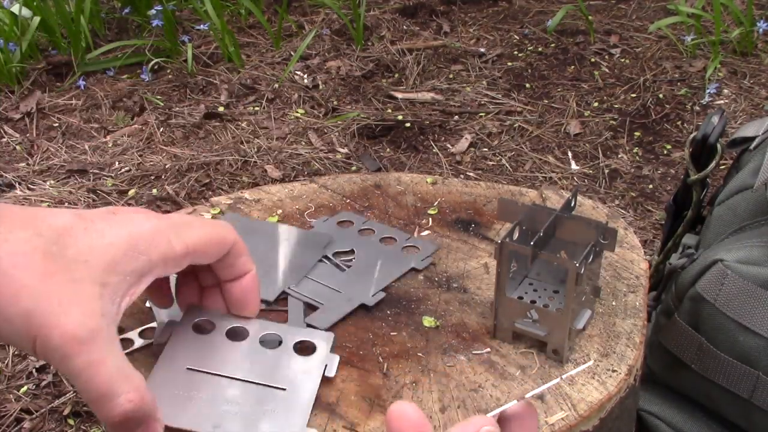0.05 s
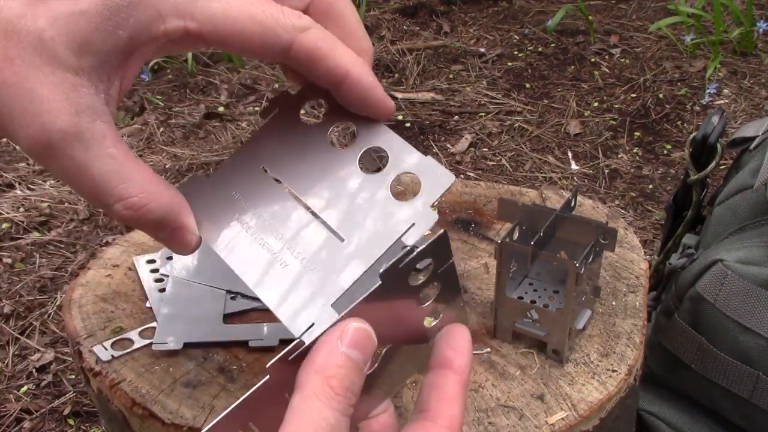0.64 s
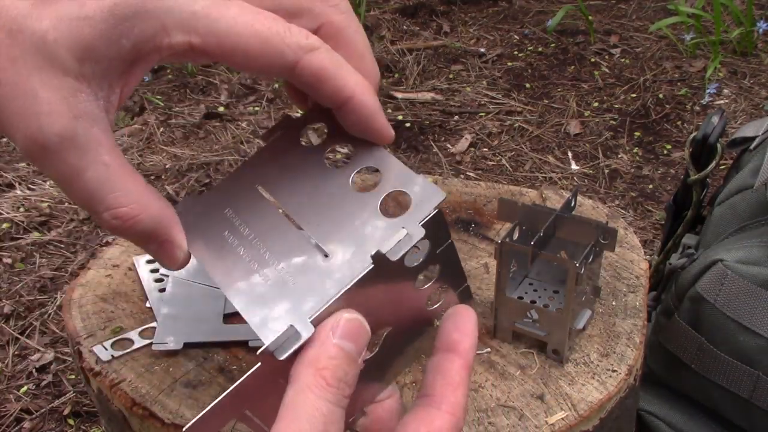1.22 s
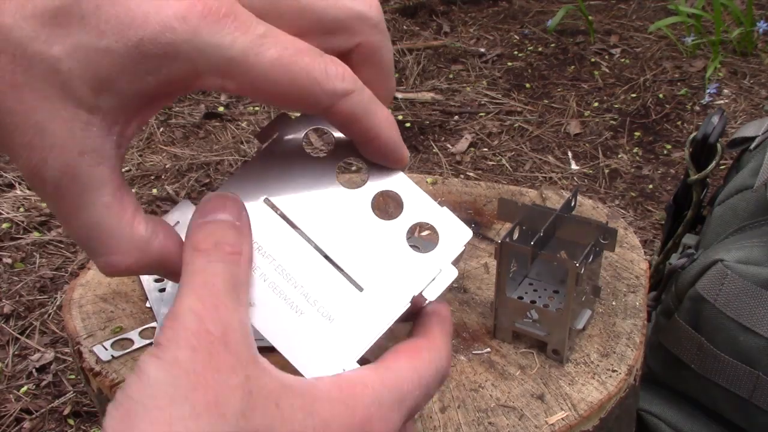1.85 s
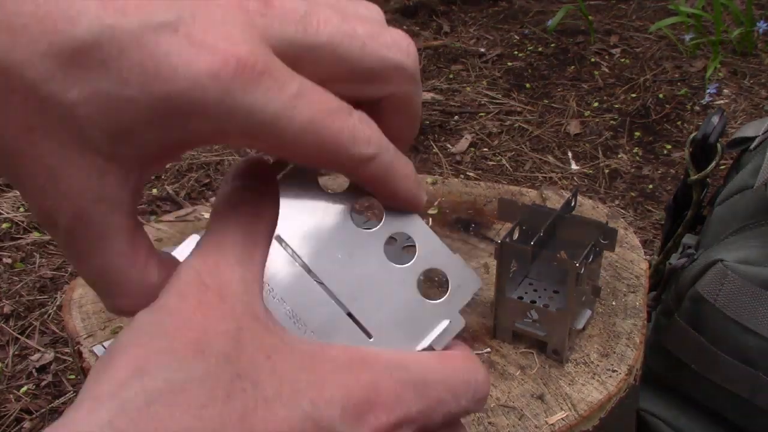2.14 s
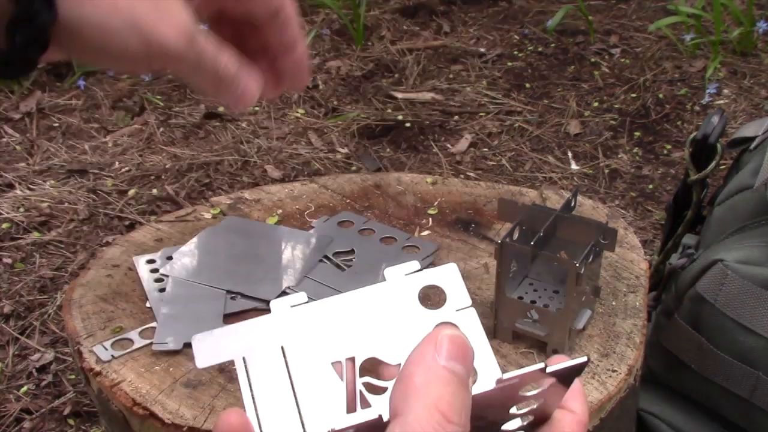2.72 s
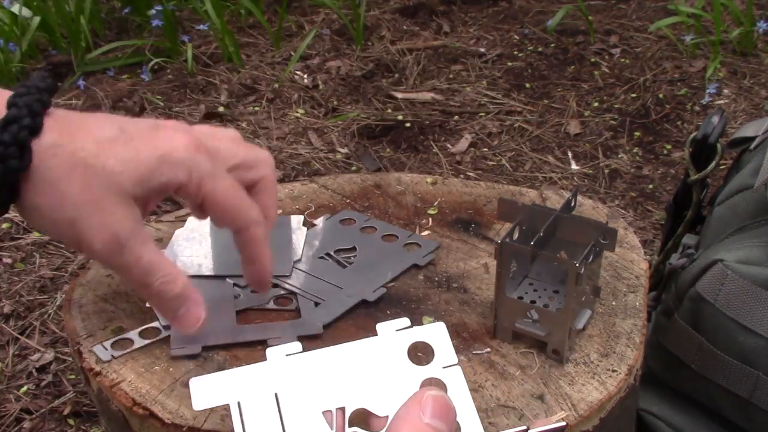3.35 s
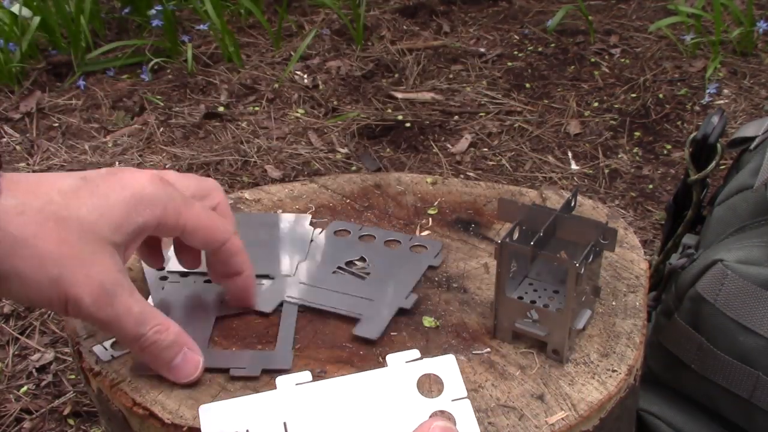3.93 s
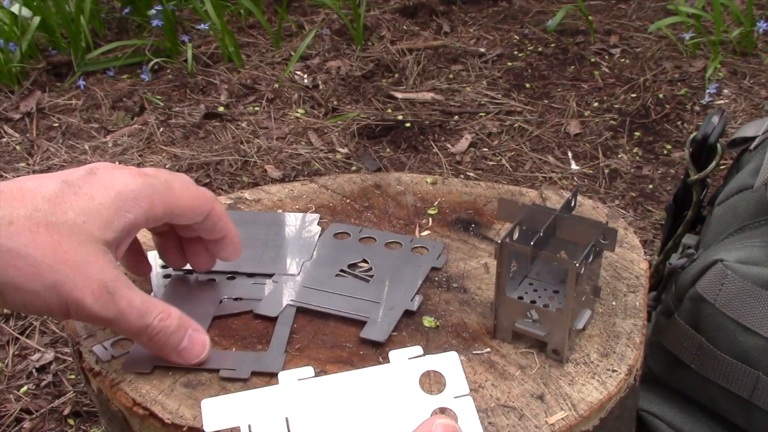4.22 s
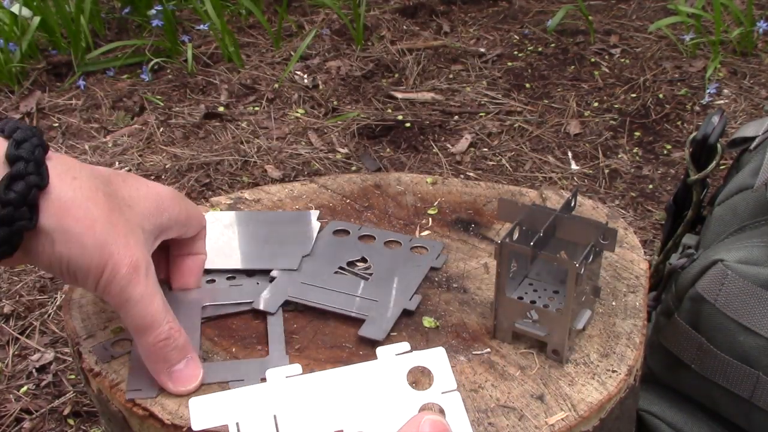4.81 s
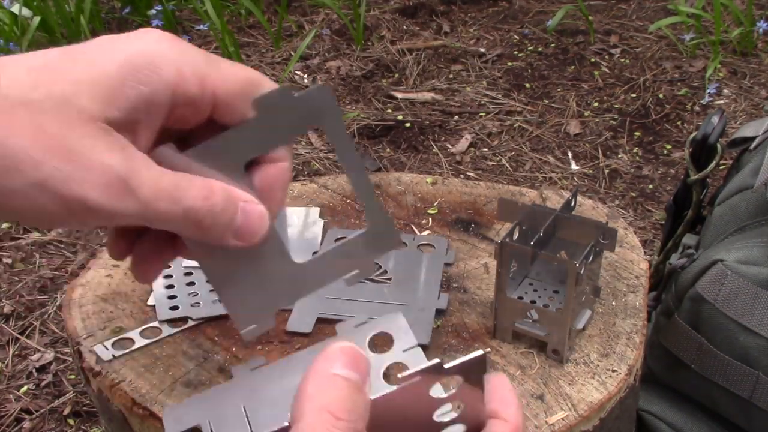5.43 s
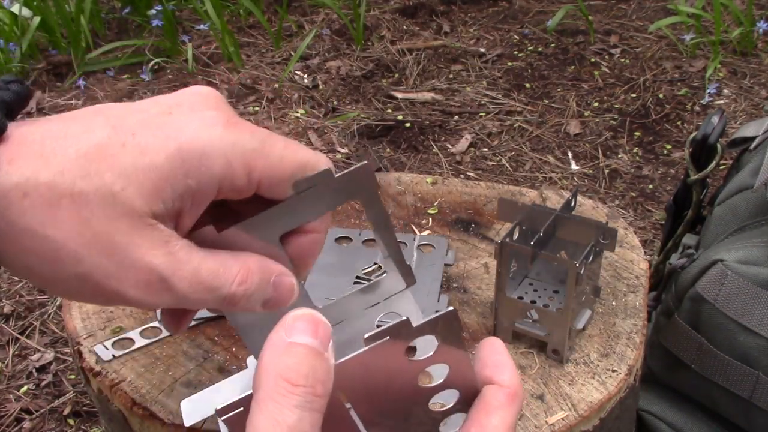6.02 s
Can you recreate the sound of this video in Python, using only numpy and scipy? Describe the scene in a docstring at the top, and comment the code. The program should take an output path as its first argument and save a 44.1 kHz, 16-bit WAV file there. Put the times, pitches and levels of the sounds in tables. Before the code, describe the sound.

Thin steel panels scrape, click and ring as they are handled outdoors, over a low rumble of far traffic.

```python
"""In a wood, close by over a tree stump, the thin steel panels of a folding stove are handled.
Loose panels are dragged off a pile: tiny rough spots catch and let go, and the panels knock and ring.
Panels held in the fingers click and scrape as their tabs are fitted together; the fingers stop the ring.
Far traffic rumbles behind, and one engine passes."""
import sys
import numpy as np
from scipy import signal
from scipy.fft import rfft, irfft
from scipy.io import wavfile
from scipy.ndimage import uniform_filter1d

SR = 44100
rng = np.random.default_rng(int(sys.argv[2]) if len(sys.argv) > 2 else 0)


def output_pcm(signal):
    """Save a mono or channel-first signal as 16-bit PCM at the path in sys.argv[1].

    Samples are clipped to [-1, 1] before scaling.
    """
    pcm = np.clip(np.atleast_2d(signal).T, -1, 1) * 32767
    wavfile.write(sys.argv[1], SR, np.round(pcm).astype(np.int16))


N = 267246
T = np.arange(N) / SR
RING_T = T[:SR // 2]
SLOTTED_S = 2.7   # by now the wall panel is joined to the held ones and the hand returns to the pile

# Spectrum of far traffic and leaves: pitch_hz, relative_db
AIR_SPECTRUM = [(15, -70), (25, -36.5), (84, -5.5), (130, 0), (249, -2), (427, -9.5), (531, -12), (887, -7),
                (2690, -28), (11300, -44.5), (14800, -53.5), (16000, -50)]
# A far engine's tones at its nearest: pitch_hz, level_db
ENGINE_HUM = [(113.0, -47.5), (236.9, -54)]

# A mode is one tone a panel rings at; the wider it is, the sooner it dies.
# Modes of the panels held in the fingers: pitch_hz, width_hz, relative_db
HELD_PANEL_MODES = [(1158, 59, 3), (1900, 270, -3.5), (3020, 44, -1), (4070, 120, -5.5), (4810, 45, -6.5),
                    (6110, 42, -4), (7100, 78, -3.5), (7400, 49, -7), (8230, 75, -4.5), (9430, 51, -5.5),
                    (12070, 100, 0.5)]
# Modes of the held panels once slotted together: pitch_hz, width_hz, relative_db
JOINED_PANEL_MODES = [(1350, 95, 2.5), (2276, 75, 1), (3710, 150, -1.5), (4440, 180, -2.5),
                      (5360, 87, -5.5), (6460, 180, -6), (7390, 100, -3.5), (8000, 76, -8), (8330, 157, -4),
                      (9720, 110, -3.5), (11000, 100, -5.5), (11500, 39, -14), (12600, 54, -10)]
# Spectrum of the held panels' short clatter: pitch_hz, relative_db
HELD_SPECTRUM = [(60, -8), (400, -25), (900, -4), (2100, 3), (3700, -1), (6000, -5), (9000, -4.5),
                 (12000, -8), (14000, -20), (16000, -8.5)]
# Fingers shift on the steel: start_s, length_s, level_db
FINGER_RUBS = [(0.464, 0.053, -68), (1.45, 0.12, -55.5), (1.628, 0.028, -60.5), (1.708, .19, -61.5),
               (1.952, 0.055, -54), (2.014, 0.066, -59.5), (2.093, 0.069, -52), (2.192, 0.026, -59),
               (2.3, 0.12, -72.5), (2.494, .05, -57.5)]
# Tabs snap in (more tilt is brighter): start_s, level_db, tilt_db_per_octave, main_pitch_hz
TAB_SNAPS = [(.673, -20.5, 5.5, 11860), (0.692, -41.5, 0, 9200), (1.021, -26, 3, 11850),
             (1.218, -29, -3, 3040), (5.552, -17, 2, 1337), (5.560, -25, 0, 3780), (5.641, -30, 3, 2880),
             (5.825, -19, -0.5, 2205), (5.839, -22.5, 11, 2770), (5.891, -25, 5.5, 950),
             (6.008, -24, -1, 2160)]
# An edge scrapes into its slot: start_s, length_s, level_db, tilt_db_per_octave, main_pitch_hz
SLOT_SCRAPES = [(0.707, 0.019, -49, -1, 8600), (0.768, 0.068, -50.5, 4, 9100),
                (0.827, 0.019, -43.5, -1.5, 3080), (0.86, 0.023, -42, -6.5, 2450),
                (0.933, 0.099, -51.5, -1, 12100), (0.988, 0.0074, -37.5, 3, 7470),
                (1.123, 0.07, -37.5, 1.5, 3600), (1.204, 0.014, -42, 1, 4880),
                (1.215, 0.017, -27.5, -0.5, 1925), (1.968, 0.012, -50, -9, 4300),
                (2.121, 0.013, -46.5, 0.5, 4520), (5.608, 0.0082, -45, 3, 6200),
                (5.63, 0.017, -32, -2.5, 2276), (5.676, 0.041, -28.5, 2, 4330),
                (5.759, 0.015, -28, -1, 2280), (5.821, 0.029, -22.5, -4.5, 3490),
                (5.881, 0.013, -30, -3, 1270), (5.943, 0.055, -36.5, -1, 2230),
                (5.987, 0.024, -26, -2, 1820)]

# Modes of the loose panels: pitch_hz, width_hz, relative_db
LOOSE_PANEL_MODES = [(1907, 28, -7.5), (2364, 8.7, -10.5), (3069, 26, -1), (3666, 24, -2), (3896, 18, -8),
                     (3930, 11, -4), (4470, 25, -6.5), (4773, 34, -8.5), (4700, 22, -2), (5072, 19, -5.5),
                     (6200, 50, -1), (6700, 17, -5.5), (7380, 19, -4.5), (7250, 24, 4.5), (7270, 11, -5.5),
                     (7680, 13, 4), (8023, 37, 1.5), (8100, 50, -12), (9110, 49, 1.5), (9200, 63, 3),
                     (9500, 30, -6), (10210, 48, 6), (10450, 36, -5), (11600, 47, -0.5), (12730, 63, -7),
                     (12920, 27, 4), (13800, 55, -4)]
# Modes of the wall panel as it slides off: pitch_hz, width_hz, relative_db
WALL_PANEL_MODES = [(1930, 19, -20), (3070, 68, -2), (3940, 55, -5), (4310, 19, 0.5), (6070, 120, -4),
                    (7300, 25, -5), (7900, 49, 5), (8800, 58, -12), (10300, 114, 1), (11260, 39, 0),
                    (12300, 63, -3)]
# Long-ringing modes of the open frame panel: pitch_hz, width_hz, relative_db
FRAME_PANEL_MODES = [(600.5, 6.3, -13), (720, 7.3, -6.5), (1116, 10.4, -9.5), (2906, 4.6, -0.5),
                     (3900, 5.2, 0.5), (5080, 6.4, -6), (5680, 10, -1), (6190, 6.9, -0.5), (7400, 17, 2),
                     (8200, 12, -2), (8700, 10, 4), (9100, 15, 5), (11200, 11, 8)]
# Spectrum of the pile's short clatter: pitch_hz, relative_db
PILE_SPECTRUM = [(60, -41), (400, -43), (1200, -16.5), (1900, -4), (2600, -7.5), (3900, -2), (5500, -8),
                 (7500, 6.5), (8600, 4.5), (10300, 4.5), (12700, 2), (13900, -10), (15200, -8.5),
                 (16500, 5)]
# The pile's ring compared with its clatter, more as the frame lifts: time_s, panels_db, frame_db
RING_FREEDOM = [(3.2, -9.5, -38), (3.65, -1, -14), (4.5, -6, -24), (4.95, -4, -11), (5.12, 6.5, -3),
                (5.35, 2, -8.5)]
# Knocks in the pile: start_s, relative_db, tilt_db_per_octave
PILE_KNOCKS = [(2.989, -36.5, -1), (3.021, -33, -6), (3.1504, -21, -7), (3.4088, -26, 0), (3.697, -17, -3),
               (3.8895, -15, -2), (3.9375, -21, 3), (4.0342, -14, -3), (4.278, -25.5, -2),
               (4.2978, -17, -1.5), (4.327, -29, 1), (4.439, -23.5, 1), (4.492, -22.5, -2), (4.551, -27, 0),
               (4.6725, -21, -3.5), (4.6962, -20.5, -4.5), (4.8779, -24, 0.5), (4.9376, -17.5, 2.5),
               (5.033, -11, -5), (5.0677, -4.5, -2.5)]
# Sudden slips in the pile: start_s, length_s, level_db, tilt_db_per_octave
PILE_SLIPS = [(0.103, 0.023, -25, -5.5), (3.011, 0.015, -36, -3.5), (3.06, .015, -40, -6),
              (3.156, 0.017, -23, -0.5), (4.035, 0.043, -21, -2.5), (4.692, .012, -17.5, -1),
              (5.03, 0.022, -16, -3), (5.07, 0.027, -12, -2.5), (5.167, 0.028, -10, 1),
              (5.199, 0.027, -12, 2.5), (5.322, 0.02, -23.5, -2)]
# Drags over the pile: full_speed_at_s, speed_up_s, hold_s, slow_down_s, treble_db, body_vs_treble_db
PANEL_DRAGS = [(0.026, 0.11, 0.09, 0.13, -24.5, -4.5), (3.081, 0.035, 0.24, 0.087, -52, -2),
               (3.419, 0.027, 0.018, 0.19, -38.5, -2.5), (3.585, 0.19, 0.013, 0.11, -35.5, -1.5),
               (3.65, 0.049, 0.12, 0.14, -32, -3.5), (3.95, 0.053, 0.084, 0.23, -29, -6.5),
               (4.042, .04, 0.027, 0.14, -23, -3.5), (4.39, .22, .025, 0.21, -32.5, -4),
               (4.721, 0.043, 0.035, 0.17, -42.5, -3), (4.95, 0.027, 0.093, .1, -29, -4),
               (5.075, .14, .16, 0.17, -14.5, -4)]

# Bands where the left and right microphones respond unequally: pitch_hz, width_hz, relative_db
MICROPHONE_BANDS = [(5700, 400, -16.5), (9630, 530, -21.5), (13200, 540, -12)]


def from_db(db):
    """Turn decibels into a gain."""
    return 10 ** (np.asarray(db) / 20)


def unit_energy(x):
    """Scale a sound so its squares add up to 1."""
    return x / np.sqrt(np.sum(x ** 2) + 1e-20)


def add(track, start_s, sound):
    """Mix a sound into a track."""
    at = max(round(start_s * SR), 0)
    track[at:at + len(sound)] += sound[:N - at]


def along(rows, t):
    """Read a table's columns at the times t, gliding between rows."""
    times, *columns = np.transpose(rows)
    return np.array([np.interp(t, times, column) for column in columns])


def noise(spectrum, size, tilt=0):
    """Noise of strength 1 with the given spectrum, tilted in dB per octave."""
    hz, db = np.transpose(spectrum)
    octave = np.log2(np.fft.rfftfreq(size, 1 / SR) + 1)
    gain = from_db(np.interp(octave, np.log2(hz), db + tilt * np.log2(hz)))
    x = irfft(rfft(rng.standard_normal(size)) * gain, size)
    return x / x.std()


def drift(per_s, size=N):
    """A slow random wander, mostly between -1 and 1."""
    return np.interp(T[:size] * per_s, np.arange(size), rng.standard_normal(size))


def far_traffic(level_db=-45.5, side_db=-20, rise_db=5, rise_at_s=3.7, ease_s=0.44):
    """Far traffic and leaves make a rumble that swells once, nearly the same in both ears."""
    air = noise(AIR_SPECTRUM, N) + from_db(side_db) * noise(AIR_SPECTRUM, N) * [[1], [-1]]
    swell = (1 + np.tanh((T - rise_at_s) / ease_s)) / 2
    return from_db(level_db + rise_db * swell) * air


def passing_engine(nearest_s=4.8, pass_s=0.48, waver_hz=2.3, waver_db=3.5):
    """A far engine's wavering hum grows as it nears and fades as it leaves."""
    hum = 0
    for hz, db in ENGINE_HUM:
        gain = from_db(db + waver_db * drift(9)) * np.sqrt(2)
        phase = 2 * np.pi * np.cumsum(hz + waver_hz * drift(8)) / SR
        hum += gain * np.sin(phase)
    distance = np.hypot(1, (T - nearest_s) / pass_s)
    return hum / distance


def ring(modes, tilt=0):
    """Clear tones die away after one touch; their strengths depend on where the panel is touched."""
    hz, width, db = np.transpose(modes)[:, :, None]
    place = rng.uniform(.65, 1.35, hz.shape) * rng.choice([-1, 1], hz.shape)
    gain = from_db(db + tilt * np.log2(hz)) * place * np.sqrt(width)
    decay = np.exp(-np.pi * width * RING_T)
    return unit_energy(np.sum(gain * decay * np.sin(2 * np.pi * hz * RING_T), axis=0))


def clatter(spectrum, fade_s, tilt=0, tail_db=-32, tail_s=0.19):
    """Modes too crowded to tell apart drop 60 dB in fade_s; a quiet tail lasts longer."""
    decay = 1000 ** (-RING_T / fade_s) + from_db(tail_db) * 1000 ** (-RING_T / tail_s)
    return unit_energy(noise(spectrum, len(RING_T), tilt) * decay)


def friction(size, per_s, spread_db):
    """Rough spots catch and let go: a stream of tiny uneven taps."""
    caught = rng.random(size) < per_s / SR
    strength = from_db(spread_db * np.minimum(rng.exponential(1, size), 3))
    taps = caught * strength * rng.choice([-1, 1], size)
    return unit_energy(taps) * np.sqrt(size)


def stroke(length_s, per_s=5000):
    """The force of a short slide: pressure swells and lets go."""
    size = max(int(length_s * SR), 16)
    pressure = np.sin(np.pi * (np.arange(size) + .5) / size) ** 0.55
    return friction(size, per_s, spread_db=4) * pressure


def impact(chatter_db, chatter_s):
    """The force of one sharp touch, after which the edge chatters to rest."""
    t = T[:SR // 10]
    chatter = friction(len(t), per_s=3000, spread_db=2.5) * np.exp(-t / chatter_s)
    force = from_db(chatter_db) * unit_energy(chatter)
    force[0] += 1
    return force


def sound_panel(force, response, level_db):
    """A force sets a panel sounding; its loudest 3 ms are set to the given level."""
    x = signal.fftconvolve(force, response)
    peak_power = uniform_filter1d(x ** 2, size=132).max()
    return from_db(level_db) * x / np.sqrt(peak_power)


def lose_bass(x, bass_hz=220):
    """Plates this small give off almost no bass."""
    return signal.sosfilt(signal.butter(2, bass_hz, "high", fs=SR, output="sos"), x)


def held_response(time_s, tilt, main_hz, main_db, main_width_hz=65):
    """A held panel's answer to a touch: fingers stop it quickly, and the contact favours one mode."""
    modes = HELD_PANEL_MODES if time_s < SLOTTED_S else JOINED_PANEL_MODES
    crowd = clatter(HELD_SPECTRUM, fade_s=0.03, tilt=tilt, tail_db=-24.5, tail_s=0.2)
    tones = from_db(-1) * ring(modes, tilt)
    return crowd + tones + from_db(main_db) * ring([(main_hz, main_width_hz, 0)])


def finger_rubs():
    """Fingers rub softly on the steel."""
    out = np.zeros(N)
    spectrum = HELD_SPECTRUM[:-1] + [(16000, -23)]   # soft skin misses the very top
    response = clatter(spectrum, fade_s=0.051, tilt=0.86)
    for start, length, db in FINGER_RUBS:
        add(out, start, from_db(db) * signal.fftconvolve(stroke(length, per_s=780), response))
    return out


def fitting_tabs(main_db=-1.5, travel_db_per_s=140):
    """The tabs of the held panels snap and scrape into their slots."""
    out = np.zeros(N)
    for start, db, tilt, main_hz in TAB_SNAPS:
        force = impact(chatter_db=-9.5, chatter_s=0.00074)
        add(out, start, sound_panel(force, held_response(start, tilt, main_hz, main_db), db))
    for start, length, db, tilt, main_hz in SLOT_SCRAPES:
        force = stroke(length)
        # a long scrape travels along the edge, so no one mode stands out
        response = held_response(start, tilt, main_hz, main_db - travel_db_per_s * length)
        add(out, start, sound_panel(force, response, db))
    return out


def pile_response(time_s, tilt):
    """The pile's answer to a touch: a short clatter, ringing panels and the frame's long ring."""
    panels, frame = from_db(along(RING_FREEDOM, time_s))
    crowd = clatter(PILE_SPECTRUM, fade_s=0.08, tilt=tilt)
    return crowd + panels * ring(LOOSE_PANEL_MODES, tilt) + frame * ring(FRAME_PANEL_MODES, tilt)


def pile_hits(knock_db=-6):
    """Loose panels knock and slip on each other."""
    out = np.zeros(N)
    for start, db, tilt in PILE_KNOCKS:
        force = impact(chatter_db=-1.5, chatter_s=0.0074)
        add(out, start, sound_panel(force, pile_response(start, tilt), db + knock_db))
    for start, length, db, tilt in PILE_SLIPS:
        add(out, start, sound_panel(stroke(length), pile_response(start, tilt), db))
    return out


def sliding_edge(t, treble_db, body_db, modes, contacts=5, wander_db=5, catch_db=-10, split_hz=5500):
    """An edge slides over the pile; its weight wanders among a few points, each with its own ring."""
    gains = {"low": from_db(body_db), "high": from_db(treble_db)}
    panels, frame = from_db(along(RING_FREEDOM, t))
    loads = from_db([wander_db * drift(43.73, len(t)) for _ in range(contacts)])
    loads /= np.sqrt(np.sum(loads ** 2, axis=0))
    out = 0
    for load in loads:
        # now and then a tab catches on a hole, more weakly as the panel lifts off
        catches = from_db(catch_db) * friction(len(t), per_s=14, spread_db=7.0) / (1 + panels ** 2)
        grinding = load * friction(len(t), per_s=1300, spread_db=3.5)
        force = (grinding + catches) / np.sqrt(1 + panels ** 2 + frame ** 2)
        crowd = clatter(PILE_SPECTRUM, fade_s=0.035)
        for share, response in ((1, crowd), (panels, ring(modes)), (frame, ring(FRAME_PANEL_MODES))):
            for band, gain in gains.items():
                part = signal.sosfilt(signal.butter(3, split_hz, band, fs=SR, output="sos"), response)
                out += signal.fftconvolve(force * share * gain, unit_energy(part))
    return out


def dragged_panels(swing_db=34.5, body_follows=0.93):
    """A wall panel slides off the pile; later the frame is worked loose. Faster is louder."""
    out = np.zeros(N)
    for full_speed_at, speed_up, hold, slow_down, treble_db, body_vs_treble_db in PANEL_DRAGS:
        corners = full_speed_at + np.array([-speed_up, 0, hold, hold + slow_down])
        t = np.arange(max(corners[0], 0), corners[-1], 1 / SR)
        speed_db = swing_db * np.interp(t, corners, [-1, 0, 0, -1])
        # the lower modes fade less than the treble, so a slow edge sounds duller
        body_db = treble_db + body_vs_treble_db + body_follows * speed_db
        modes = WALL_PANEL_MODES if full_speed_at < SLOTTED_S else LOOSE_PANEL_MODES
        add(out, t[0], sliding_edge(t, treble_db + speed_db, body_db, modes))
    return out


def scene(echo_db=-24, echo_s=.0005):
    """The steel is straight ahead, the traffic behind; a little is added left and taken away right."""
    held = lose_bass(finger_rubs() + fitting_tabs())
    steel = lose_bass(dragged_panels() + pile_hits()) + held
    echo = np.interp(T - echo_s, T, held)
    side = from_db(echo_db) * np.gradient(echo)   # treble glances off the near hand
    for hz, width, db in MICROPHONE_BANDS:
        resonance = signal.butter(1, [hz - width / 2, hz + width / 2], "band", fs=SR, output="sos")
        band = signal.sosfilt(resonance, steel)
        side -= from_db(db) * np.gradient(band)   # taking the slope shifts the wave a quarter cycle
    return steel + side * [[1], [-1]] + far_traffic() + passing_engine()


def record(dry, ceiling=.8, cutoff_hz=16000):
    """The highest peaks are rounded and the very top of the treble is cut."""
    rounded = dry / (1 + (dry / ceiling) ** 6) ** (1 / 6)
    return signal.sosfilt(signal.ellip(12, .1, 80, cutoff_hz, fs=SR, output="sos"), rounded)


dry = scene()
out = record(dry)
output_pcm(out)
```